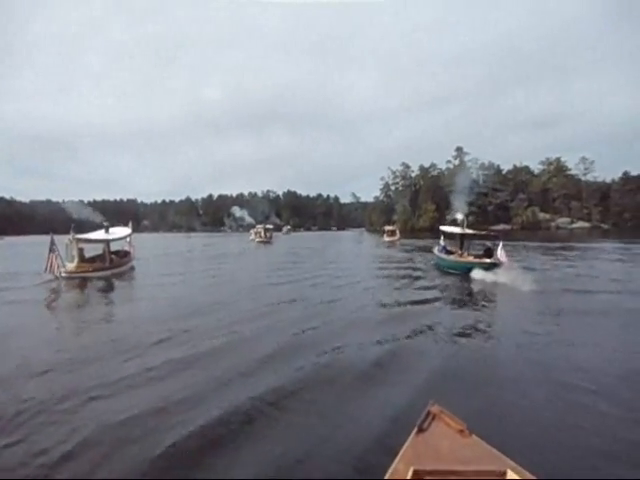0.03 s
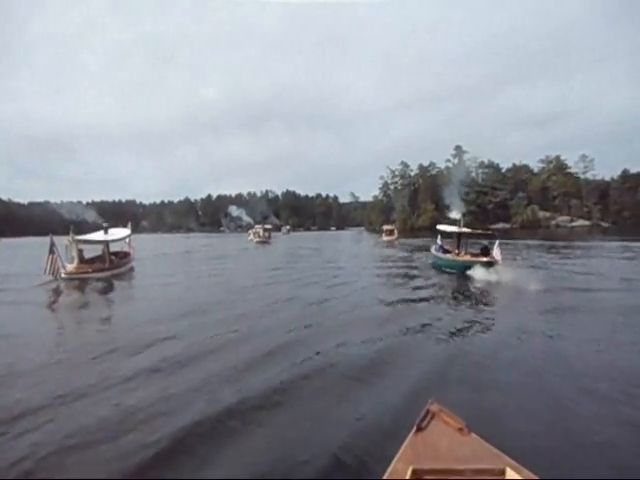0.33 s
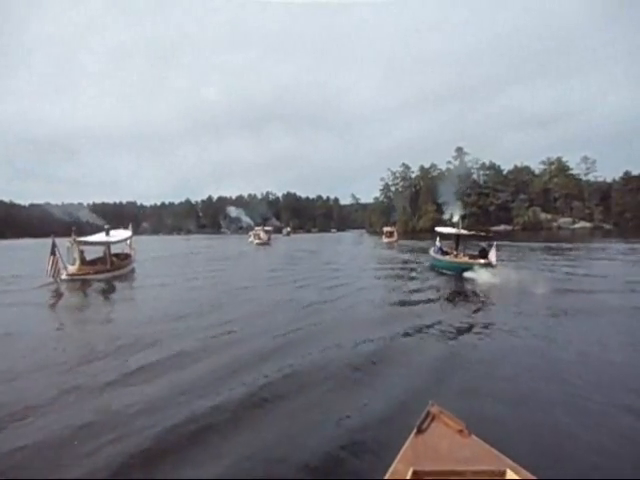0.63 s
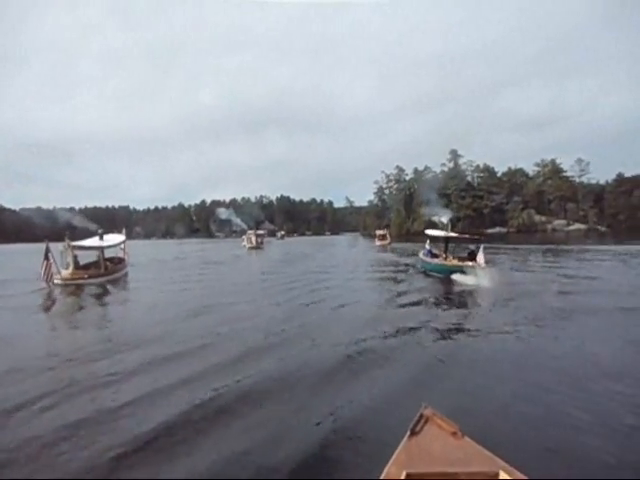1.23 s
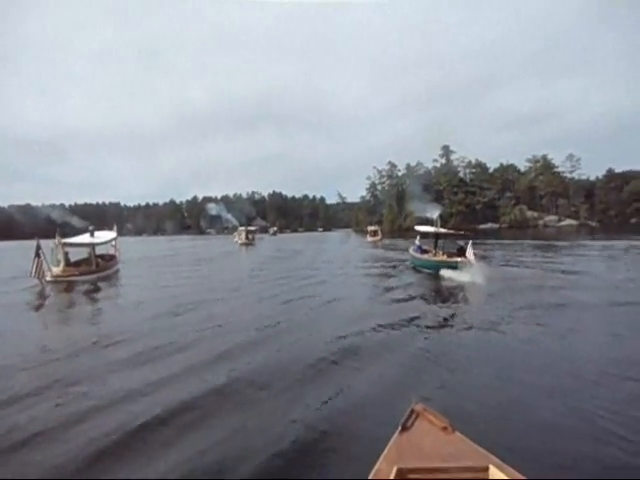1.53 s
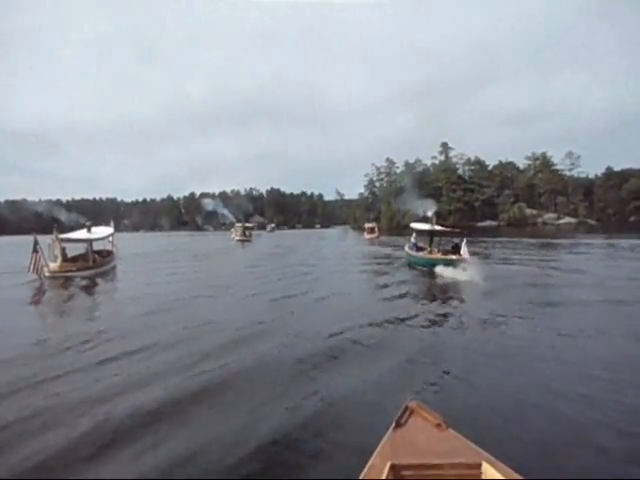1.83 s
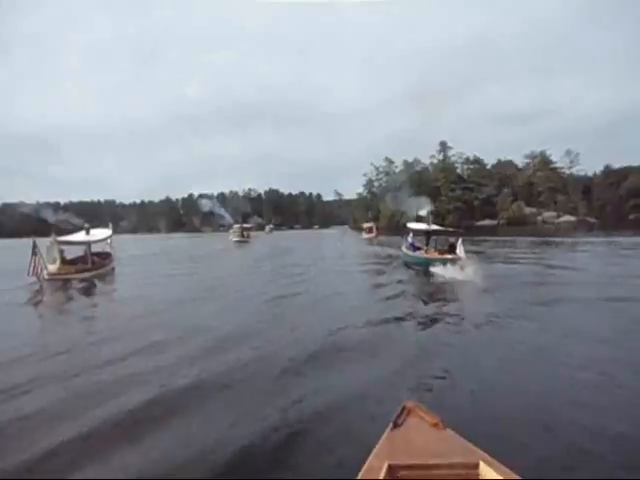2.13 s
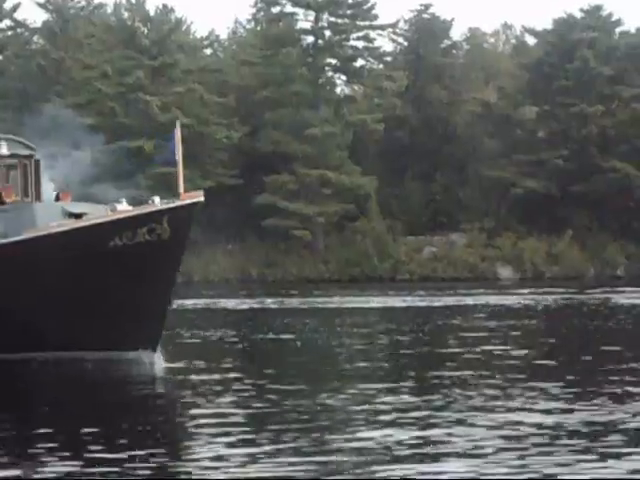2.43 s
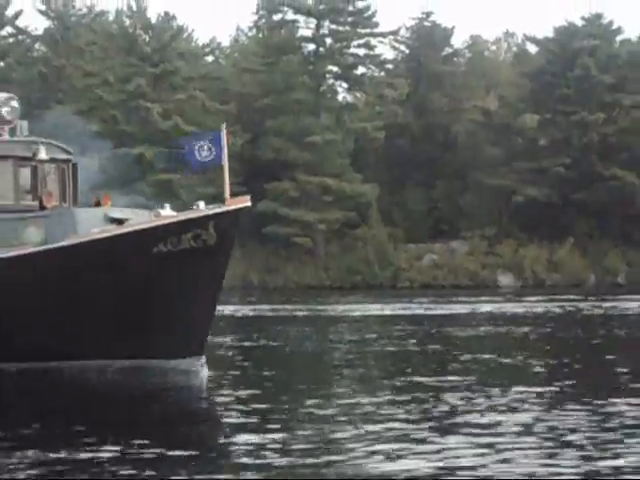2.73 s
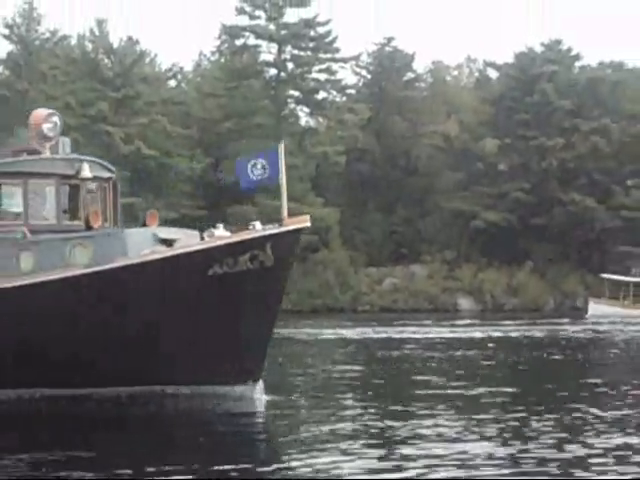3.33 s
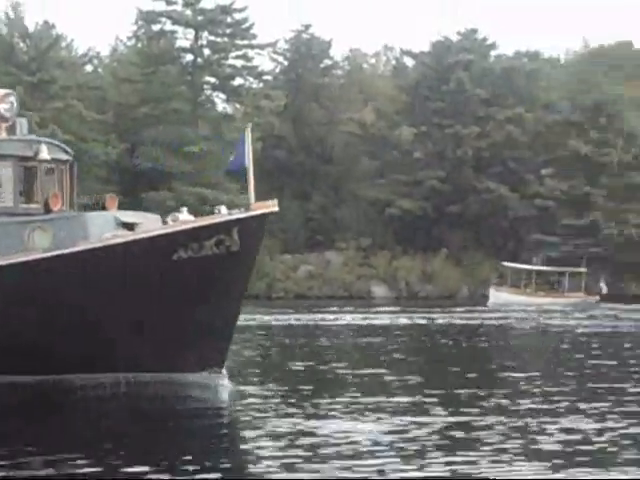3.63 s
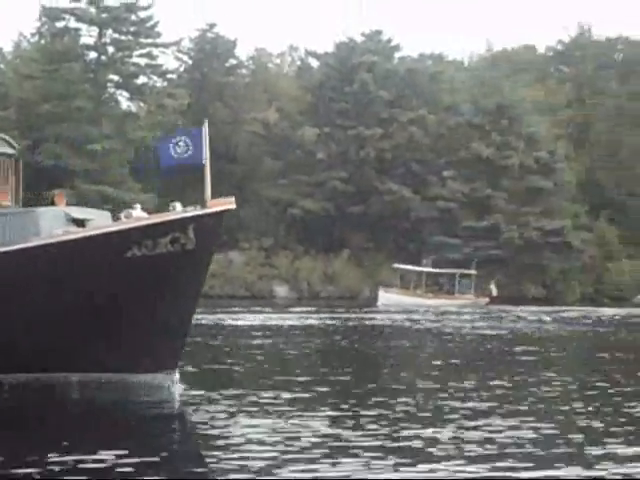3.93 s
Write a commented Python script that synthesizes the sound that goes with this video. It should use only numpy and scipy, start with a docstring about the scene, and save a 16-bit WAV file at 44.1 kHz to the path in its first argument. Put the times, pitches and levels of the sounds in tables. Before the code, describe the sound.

A steam launch lets out four even, hissing puffs on a lake, heard from a small boat whose hull rumbles with slapping water. After a brief silence, a larger boat's engine throbs low. A hard fitting clacks three times throughout.

```python
"""On a lake, in a small boat: the hull rumbles and booms as water washes and slaps along it.
A steam launch nearby lets out four evenly spaced puffs that hiss and ring in its exhaust pipe.
After a short silence the place changes: a larger boat glides by, its engine throbbing low.
A hard fitting clacks three times, and a low-rate recorder adds a glassy edge to everything."""
import sys
import numpy as np
from scipy import signal
from scipy.fft import rfft, irfft
from scipy.io import wavfile

SR = 44100
rng = np.random.default_rng(int(sys.argv[2]) if len(sys.argv) > 2 else 0)


def wav_out(sig):
    """Save sig, one row per channel (or a flat mono array), as 16-bit PCM at SR to the path in sys.argv[1]."""
    wavfile.write(sys.argv[1], SR, np.round(np.clip(np.atleast_2d(sig).T, -1, 1) * 32767).astype(np.int16))


N = 176400
TIME = np.arange(N) / SR
FREQS = np.maximum(np.arange(N // 2 + 1) * SR / N, 1)

# notes the small boat's hull rings at: pitch_hz, width_hz, relative_db
HULL_RESONANCES = [(66.4, 18, -3.5), (134, 32, -4), (242.3, 62, 0), (315, 33.6, 1), (520.8, 58, -3.5),
                   (609.7, 43, -4), (905, 36, -14), (1049, 90, -12), (1445, 47, -19), (1930, 91, -15.5)]
# little waves hitting the hull: start_s, level_db
WAVE_SLAPS = [(0.22, -23), (0.5, -27.5), (0.822, -24.5), (1.075, -21), (1.26, -25), (1.526, -25),
              (1.701, -30), (1.759, -28.5), (2.001, -20.5), (2.175, -25.5)]
# water washing along the hull, from bass to treble: pitch_hz, relative_db
WASH_SPECTRUM = [(30, -3.5), (170, -2), (420, -7.5), (750, -6.5), (1280, -14.5), (2000, -14), (2400, -19.5),
                 (3500, -22.5), (5200, -27.5)]
# open water around the larger boat: pitch_hz, relative_db
LAKE_SPECTRUM = [(30, -10.5), (140, -1.5), (400, -9.5), (950, -14.5), (2150, -21), (2400, -26), (3500, -29),
                 (5200, -33)]
# notes the larger boat's machinery drones at: pitch_hz, width_hz, relative_db
MACHINERY_RESONANCES = [(62, 20, 2), (121, 35, 1), (251, 41, -5.5), (523, 28, -8.5), (584, 32, -0.5),
                        (770, 23.4, -2.5), (889, 50, -5), (1122, 85, -10), (1430, 48, -13),
                        (1680, 100, -16.5), (2150, 60, -14)]
# beats of its engine: peak_s, level_db
ENGINE_BEATS = [(2.64, -36), (2.89, -29.5), (3.18, -28.5), (3.45, -30.5), (3.66, -29), (3.84, -27.5),
                (3.95, -31)]
# knocks of the hard fitting: start_s, level_db
KNOCKS = [(0.406, -22.5), (1.513, -38), (3.9649, -26)]
# notes the fitting rings at: pitch_hz, relative_db, ring_s
FITTING_NOTES = [(1422, 1, .035), (1570, 1, 0.034), (1820, 0.5, 0.018), (2220, -1, 0.015),
                 (2660, -4, 0.022), (3320, -11, .015), (4320, -14, 0.021)]
# notes the exhaust pipe rings at: pitch_hz, width_hz, relative_db
PIPE_RESONANCES = [(1570, 95, -5), (2077, 57, -5), (2990, 130, -10.5), (3490, 26, -4.5), (3549, 44, 1),
                   (3889, 53, 2.5), (4036, 38, -3.5), (4180, 50, -7.5), (4410, 95, -5), (5060, 70, -6)]
# broad hiss of the steam jet: pitch_hz, relative_db
JET_SPECTRUM = [(600, -11.5), (1000, 0.5), (1600, 0.5), (2500, 1), (3100, 4), (3800, 0.5), (4400, 3.5),
                (5300, -1.5)]
# puffs of steam: start_s, level_db, hold_s, low_whistle_db, high_whistle_db, treble_db
STEAM_PUFFS = [(-0.05, -30.5, 0.075, -20, -11.5, 5), (0.578, -32.5, 0.11, -14, -20, -6),
               (1.238, -31.5, 0.081, -15.5, -11, 2), (1.889, -32, 0.093, -6, -24, -6)]


def from_db(db):
    """Turn decibels into a number to multiply a sound by."""
    return 10 ** (np.asarray(db) / 20)


def rms_one(x):
    """Scale a sound so that its average level (rms) is 1."""
    return x / np.sqrt(np.mean(x ** 2) + 1e-20)


def noise(gain):
    """Noise shaped by a gain at each frequency, then brought to level 1."""
    return rms_one(irfft(rfft(rng.standard_normal(N)) * gain, N))


def flutter(rate_hz, depth_db):
    """A multiplier that wanders at random around 1."""
    return from_db(depth_db * noise(1 / (1 + (FREQS / rate_hz) ** 2)))


def hiss(spectrum):
    """Swirling water or steam makes noise spread over many pitches."""
    hz, db = np.transpose(spectrum)
    return noise(from_db(np.interp(np.log(FREQS), np.log(hz), db)))


def resonant(peaks):
    """An object shaken at random rings in narrow bands around its own notes."""
    power = 0
    for hz, width_hz, db in peaks:
        off_pitch = (FREQS - hz * hz / FREQS) / (2 * width_hz)
        power = power + (from_db(db) / (1 + 2 * off_pitch ** 2)) ** 2
    return noise(np.sqrt(power))


def ring(clicks, hz, ring_s):
    """Each click starts a pure tone that fades by 60 dB in ring_s."""
    decay, turn = from_db(-60 / (ring_s * SR)), 2 * np.pi * hz / SR
    return signal.lfilter([0, np.sin(turn)], [1, -2 * decay * np.cos(turn), decay ** 2], clicks + 1e-18)


def drops(cycles, spread_db, per_s=130, pitch_count=16):
    """Small splashes and bubbles come at random, each ringing for a few cycles."""
    sizes = from_db(spread_db * np.minimum(rng.exponential(1, N), 4)) * rng.choice([-1, 1], N)
    clicks = sizes * (rng.random(N) < per_s / SR)
    chosen = rng.integers(0, pitch_count, N)
    pitches = np.geomspace(800, 4600, pitch_count)
    return rms_one(sum(ring(clicks * (chosen == k), hz, cycles / hz) for k, hz in enumerate(pitches)))


def small_boat(slap_rise_s=0.0065):
    """The hull rumbles and booms dully under each little wave, while water washes and splashes by."""
    rumble = from_db(-29) * resonant(HULL_RESONANCES) * flutter(rate_hz=41, depth_db=1.0)
    push = 0
    for start_s, level_db in WAVE_SLAPS:
        rise = np.maximum(TIME - start_s, 0) / slap_rise_s
        push = push + from_db(level_db) * rise * np.exp(1 - rise)
    dull_band = signal.butter(2, [170, 680], "band", fs=SR, output="sos")
    slaps = push * signal.sosfilt(dull_band, resonant(HULL_RESONANCES))
    wash = from_db(-34) * hiss(WASH_SPECTRUM) * flutter(rate_hz=25, depth_db=1.0)
    splashes = from_db(-51.5) * drops(cycles=7.1, spread_db=3.5)
    return rumble + slaps + wash + splashes


def large_boat(engine_hz=121.4, beat_width_s=0.027):
    """A low engine note swells with each beat, over droning machinery and lapping water."""
    beats = sum(from_db(db) * np.exp(-.5 * ((TIME - s) / beat_width_s) ** 2) for s, db in ENGINE_BEATS)
    pitch_hz = engine_hz * flutter(rate_hz=11.7, depth_db=0.6)
    throb = beats * flutter(rate_hz=30, depth_db=1.5) * np.sin(2 * np.pi * np.cumsum(pitch_hz) / SR)
    water = from_db(-36.5) * hiss(LAKE_SPECTRUM) * flutter(rate_hz=33, depth_db=1.1)
    splashes = from_db(-57.5) * drops(cycles=8.9, spread_db=1.5)
    machinery = from_db(-36) * resonant(MACHINERY_RESONANCES)
    return water + splashes + machinery + throb


def clacks(rattle_s=0.0057, tail_s=0.02):
    """A hard fitting knocks with a dry crack, and a very brief rattle sets it ringing."""
    force = 0
    for start_s, level_db in KNOCKS:
        age = np.maximum(TIME - start_s, 0)
        fade = np.exp(-age / rattle_s) + from_db(-12.5) * np.exp(-age / tail_s)
        force = force + (TIME >= start_s) * from_db(level_db) * fade
    rattle = force * rng.standard_normal(N) / np.sqrt(rattle_s * SR)
    crack = from_db(-3.5) * force * hiss([(500, -21), (1400, 9.5), (5000, -4.5)])
    ringing = sum((-1) ** k * from_db(db) * ring(rattle, hz, ring_s)
                  for k, (hz, db, ring_s) in enumerate(FITTING_NOTES))
    return crack + ringing


def steam_exhaust(rise_s=0.055, fall_db_per_s=152.5, whistles_hz=(3378, 5000), treble_hz=4600):
    """Each engine stroke opens a valve: steam hisses out, rings in the pipe and whistles faintly."""
    pipe = from_db(-3.5) * resonant(PIPE_RESONANCES)
    low_whistle, high_whistle = (resonant([(hz, 21, 0)]) for hz in whistles_hz)  # 21 Hz wide
    jet = from_db(1) * hiss(JET_SPECTRUM)
    treble = irfft(rfft(jet) * (1 + np.tanh(10 * np.log(FREQS / treble_hz))) / 2, N)
    puffs = 0
    for start_s, level_db, hold_s, low_whistle_db, high_whistle_db, treble_db in STEAM_PUFFS:
        age = TIME - start_s
        fall_db = fall_db_per_s * np.maximum(age - rise_s - hold_s, 0)
        flow = np.clip(age / rise_s, 0, 1) * from_db(level_db - fall_db)  # swells, holds, dies away
        puff_hiss = jet + (from_db(treble_db) - 1) * treble
        whistles = from_db(low_whistle_db) * low_whistle + from_db(high_whistle_db) * high_whistle
        puffs = puffs + flow * (pipe + puff_hiss + whistles)
    return puffs * flutter(rate_hz=31, depth_db=1.0)


def scene(first_end_s=2.331, second_start_s=2.6):
    """Two spots on the lake, with a silence between them."""
    first = (small_boat() + steam_exhaust()) * (TIME < first_end_s)
    second = large_boat() * (TIME >= second_start_s)
    return (first + second + clacks())[None]


def record(dry, hold_samples=4, cutoff_hz=15800):
    """The recorder drops deep bass and holds every fourth sample, mirroring the sound into the treble."""
    band = 1 / np.sqrt((1 + (FREQS / 5250) ** 26) * (1 + (42 / FREQS) ** 6))  # keeps 42 to 5250 Hz
    filtered = irfft(rfft(dry) * band, N)
    held = np.repeat(filtered[:, ::hold_samples], hold_samples, axis=1)[:, :N]
    return irfft(rfft(held) / np.sqrt(1 + (FREQS / cutoff_hz) ** 300), N)


dry = scene()
out = record(dry)
wav_out(out)
```